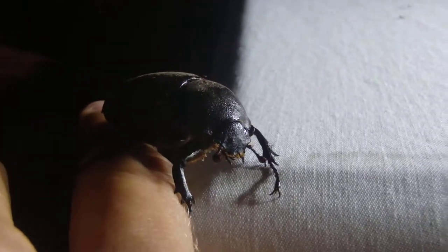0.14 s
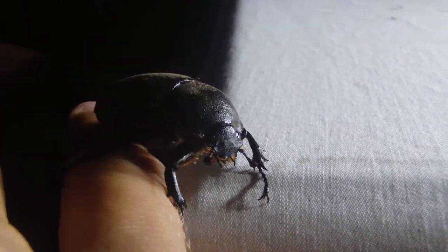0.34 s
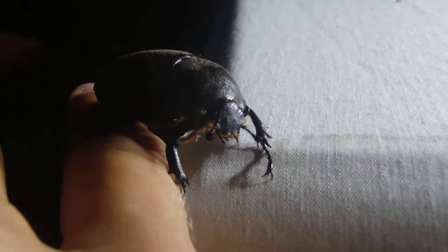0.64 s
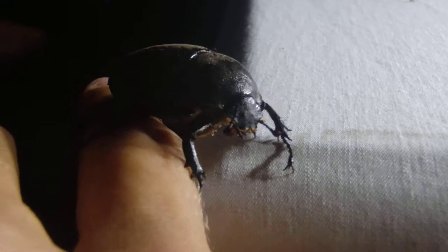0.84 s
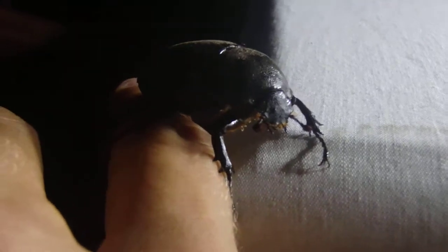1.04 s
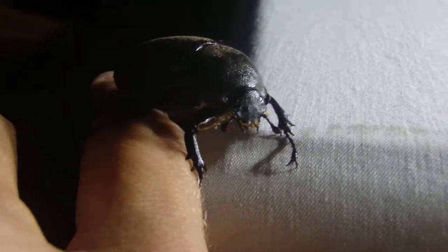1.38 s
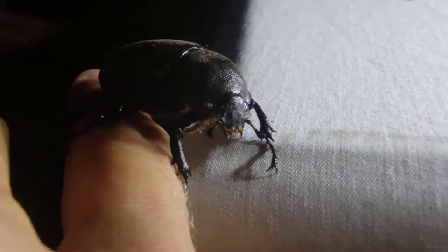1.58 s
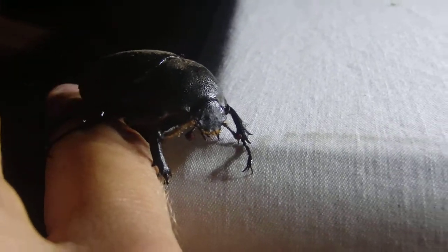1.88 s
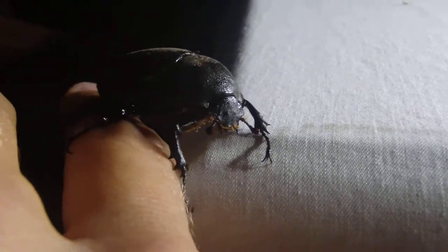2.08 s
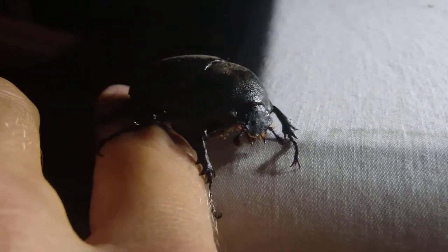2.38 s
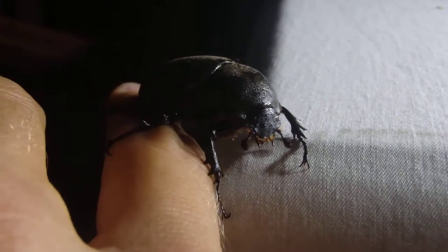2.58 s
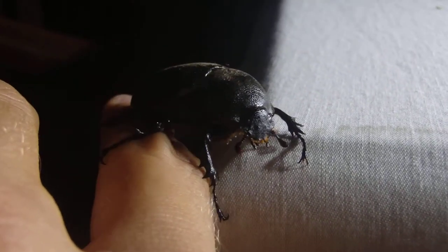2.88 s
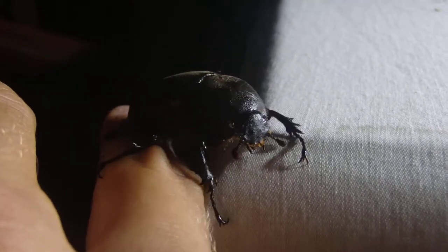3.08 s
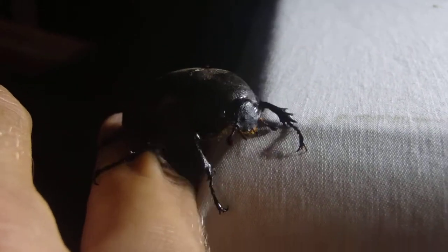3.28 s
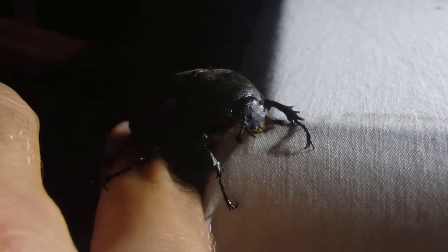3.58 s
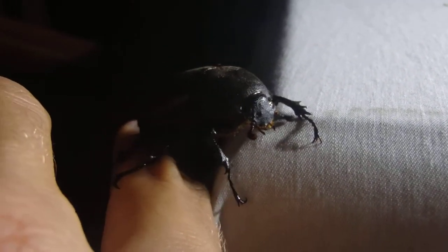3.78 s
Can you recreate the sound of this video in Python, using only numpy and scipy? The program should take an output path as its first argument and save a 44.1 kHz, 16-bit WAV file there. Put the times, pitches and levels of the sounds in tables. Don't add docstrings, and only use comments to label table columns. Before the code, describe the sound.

Quiet room with soft hiss and wavering motor hum; a small knock early, faint cloth brushing and steady camera ticking, then one scratchy beetle squeak very near the left microphone, followed by sparser ticks.

```python
import sys
import numpy as np
from scipy import signal
from scipy.fft import rfft, irfft, next_fast_len
from scipy.io import wavfile
from scipy.ndimage import uniform_filter1d

SR = 44100
rng = np.random.default_rng(int(sys.argv[2]) if len(sys.argv) > 2 else 0)


def int16_out(signal):
    q = np.round(np.clip(np.atleast_2d(signal).T, -1, 1) * 32767)
    wavfile.write(sys.argv[1], SR, q.astype(np.int16))


def field_ratio(decibels):
    return 10 ** (np.asarray(decibels, dtype=float) / 20)


N = 173754


def evened(x):
    return x / np.sqrt(np.mean(x ** 2) + 1e-20)


def wander(size):
    once = uniform_filter1d(rng.standard_normal(N), size=size)
    return evened(uniform_filter1d(once, size=size))


def read(points, hz):
    f, value = np.transpose(points)
    return np.interp(np.log(hz + 1), np.log(f + 1), value)


def causal(gain):
    log = np.log(np.concatenate([gain, gain[-2:0:-1]]) + 1e-5)
    return np.fft.ifft(np.exp(np.conj(signal.hilbert(log)))).real[:1024]


def clicks(s, db):
    out, at = np.zeros(N), np.asarray(s) * SR
    k = np.floor(at).astype(int)[:, None] + np.arange(-8, 9)
    offset = k - at[:, None]
    np.add.at(out, k, field_ratio(db)[:, None] * np.sinc(offset) * np.cos(offset * np.pi / 20) ** 2)
    return out


def ring(modes, rise_s):
    t = np.arange(3000) / SR
    out = np.zeros((2, len(t)))
    for k, (hz, db, t60, pan) in enumerate(modes):
        level_db = db - 60 * t / t60 + pan * np.array([[.5], [-.5]])
        out += (-1) ** k * field_ratio(level_db) * np.sin(2 * np.pi * hz * t)
    out = out * np.minimum(t / rise_s, 1)
    return out / abs(out).max()


def strike(hits, body):
    return signal.oaconvolve(hits[None], body, axes=1)[:, :N]


def room(x):
    level_db, t60 = -24, .18
    t = np.arange(12000) / SR
    signs = rng.choice([-1., 1.], (2, len(t)))
    sparse = rng.random((2, len(t))) < .05
    tail = signs * sparse * (t > .003) * field_ratio(-60 * t / t60)
    return field_ratio(level_db) * signal.fftconvolve(x, tail / np.linalg.norm(tail[0]), axes=1)[:, :N]


def hiss():
    # (frequency [Hz], density [dB per Hz])
    rumble = [(15, -28), (25, -33), (49, -12.5), (321, -2.5), (381, -7), (528, -4.5), (585, -6.5),
              (659, -7), (1500, -10), (1950, -50), (3300, -120)]
    # (frequency [Hz], density [dB per Hz])
    fizz = [(880, -30), (1500, -1.5), (2040, -1.5), (4330, -3), (5330, -5), (6960, -5.5), (14300, -4),
            (15200, -2), (16000, -15)]
    # (frequency [Hz], correlation [0 to 1])
    likeness = [(60, 0.0031), (130, 0.67), (290, 0.75), (640, 0.48), (1410, 0.34), (3100, 0), (6820, 0),
                (15000, -0.0)]
    # (frequency [Hz], left over right [dB])
    balance = [(25, -6), (60, -3), (125, -1), (3000, 0), (4300, 3.5), (6000, 0)]
    rumble_db, fizz_db, patch_db = -55.5, -50.5, 0.68
    frames, hz = N // 512 + 5, np.fft.rfftfreq(2048, 1 / SR)
    a, b, c, d, patches = rng.standard_normal((frames, 1025, 5)).T
    patches = uniform_filter1d(uniform_filter1d(patches, size=24, axis=0), size=6, axis=1)
    patches = evened(patches)
    low = field_ratio(read(rumble, hz)) * (hz < 1500)
    high = field_ratio(read(fizz, hz)) * (hz >= 1500)
    shape = field_ratio(rumble_db) * low / np.linalg.norm(low) + field_ratio(fizz_db) * high / np.linalg.norm(high)
    same = np.clip(read(likeness, hz), -1, 1)[:, None]
    left = a + 1j * b
    right = same * left + np.sqrt(1 - same ** 2) * (c + 1j * d)
    sides = np.array([.5, -.5])[:, None, None]
    level_db = patch_db * patches + read(balance, hz)[:, None] * sides
    z = np.array([left, right]) * shape[:, None] * field_ratio(level_db)
    noise = signal.istft(z, nperseg=2048, noverlap=1536)[1][:, :N]
    return np.linalg.norm(shape) * evened(noise)


def hum():
    # (frequency [Hz], level [dB rms], wavering [dB])
    tones = [(310, -77.5, 4.5), (362.8, -69, 4), (392.5, -66.5, 3), (589.5, -53.5, 1), (776, -77.5, 6.5),
             (875, -77.5, 8), (992, -93, 2)]
    t, out = np.arange(N) / SR, np.zeros(N)
    for hz, db, waver_db in tones:
        level, phase = wander(3000), wander(3000)
        angle = 2 * np.pi * hz * t + 0.096 * waver_db * phase + 6 * rng.random()
        out += np.sqrt(2) * field_ratio(db + waver_db * np.tanh(level)) * np.sin(angle)
    return out * field_ratio([[-.3], [.3]])


def whine():
    # (time at lowest [s], lowest frequency [Hz], half length [s])
    dips = [(.4, 7000, .021), (.532, 15200, .014), (.715, 13600, .008), (1.031, 13200, .011),
            (1.058, 11100, .018), (1.157, 10200, .016), (1.334, 9000, .011), (1.392, 6000, .02),
            (1.675, 8500, .022), (1.924, 10900, .013), (2.42, 10900, .012), (2.605, 15000, .005)]
    t = np.arange(N) / SR
    swoops = [low + (16000 - low) * abs((t - s) / half) ** 1.6 for s, low, half in dips]
    hz = np.min(swoops, 0)
    level_db = -54 + np.interp(hz, [8000, 11000, 14000, 15500], [-12, 0, 0, -5])
    level_db = level_db + np.array([[-9.], [0]])
    tone = np.sin(2 * np.pi * np.cumsum(np.minimum(hz, 18000)) / SR)
    return np.sqrt(2) * field_ratio(level_db) * (hz < 18000) * tone


def brushes():
    # (time [s], level [dB], t60 [s])
    rustles = [
        (.936, -53, .3),
        (1.084, -54, .4),
        (1.393, -54, .15),
    ]
    t = np.arange(N) / SR
    grit = rng.standard_normal((2, N)) * (rng.random(N) < .08)
    grit = grit + 0.52 * grit[::-1]
    band = signal.butter(2, [2100, 4900], "band", fs=SR, output="sos")
    fades = sum((t > s) * field_ratio(db - 60 * abs(t - s) / t60) for s, db, t60 in rustles)
    return evened(signal.sosfilt(band, grit)) * fades


def ticks():
    # (time [s], peak level [dB])
    steps = [(0.0872, -45), (0.4878, -43), (0.5527, -45), (0.622, -44), (0.699, -48), (0.7547, -40.5),
             (0.8877, -40), (1.0211, -36.5), (1.1557, -39), (1.2873, -36.5), (1.4204, -37), (1.5544, -36.5),
             (1.6202, -37.5), (1.6878, -40.5), (1.821, -34.5), (1.9544, -49), (2.0875, -38), (2.2226, -39),
             (2.3548, -36.5), (2.489, -35.5), (2.6215, -38), (3.147, -49), (3.4224, -35), (3.55684, -34.5),
             (3.6902, -38.5), (3.8238, -43)]
    soft_steps = [.5524, .6993, .8873, 1.1552, 1.6194, 1.6887, 2.0884, 2.2223, 3.8235]
    # (frequency [Hz], level [dB], t60 [s], left over right [dB])
    body = [(1240, 0, 0.014, -2), (1700, -1, 0.011, -1), (2150, -3, .006, 1)]
    # (frequency [Hz], level [dB], t60 [s], left over right [dB])
    snap_modes = [(2560, 0, .007, 3), (3120, 1, .007, 3), (3800, -1, .007, 8), (4600, -2, .006, -2)]
    s, db = np.transpose(steps)
    soft = abs(s[:, None] - soft_steps).min(1) < .004
    thud_db = db - 1.5 + 1.5 * soft
    snap_db = db + 1 + .3 * (db + 38) - 7 * soft
    thud = strike(clicks(s + .0005, thud_db), ring(body, .0005))
    snap = strike(clicks(s + .0003, snap_db), ring(snap_modes, .0003))
    return thud + snap


def small_blips():
    # (time [s], level [dB], frequency [Hz])
    blips = [(.1856, -37, 3820), (.266, -39, 2700), (3.1888, -45, 4450), (3.2128, -40, 3620),
             (3.225, -45, 3900), (3.3785, -45, 4150), (3.449, -41, 4450)]
    out = np.zeros((2, N))
    for s, db, hz in blips:
        out += strike(clicks([s], [db]), ring([(hz, 0, .007, 6), (.8 * hz, -6, .005, 0)], .0008))
    return out


def knock():
    # (frequency [Hz], level [dB], t60 [s], left over right [dB])
    modes = [(770, 0, .026, 0), (1400, -12, .008, 0), (2300, -9, .009, -2), (3100, -6, .008, 0),
             (4400, -6, .006, 6), (6500, -1, .008, 4), (7300, -2, .004, 4), (8800, -4, .003, 4)]
    start_s, level_db = .2132, -26.5
    tail_db, tail_t60 = -6.5, 0.19
    t = np.arange(N) / SR - start_s
    tap = strike(clicks([start_s, start_s + .0009], [level_db, level_db + 1]), ring(modes, .0002))
    tap = signal.lfilter(*signal.butter(2, 450, "high", fs=SR), tap)
    band = signal.butter(1, [600, 3800], "band", fs=SR, output="sos")
    rattle = signal.sosfilt(band, rng.standard_normal((2, N)))
    return tap + rattle * (t > 0) * field_ratio(level_db + tail_db - 60 * abs(t) / tail_t60)


def scrape(curve):
    slips_per_s, clump_db = 5000, 1.4
    s, db = np.transpose(curve)
    clump = wander(250)
    grit = rng.standard_normal(N) * (rng.random(N) < slips_per_s / SR)
    grit = evened(grit * field_ratio(clump_db * clump))
    grit = signal.lfilter(*signal.butter(2, [1000, 4900], "band", fs=SR), grit)
    return grit * field_ratio(np.interp(np.arange(N) / SR, s, db, -140, -140))


def shell_rubbing():
    # (time [s], level [dB])
    stirring = [(0.12, -72), (0.19, -61), (0.24, -58.5), (0.33, -63), (0.42, -72)]
    # (time [s], level [dB])
    squeeze = [(2.27, -68), (2.36, -54.5), (2.39, -65.5), (2.52, -52), (2.62, -53), (2.84, -58),
               (2.87, -67), (2.9, -61), (2.98, -60)]
    # (time [s], level [dB])
    settling = [(2.98, -51), (3.0, -48), (3.025, -48), (3.035, -46.5), (3.065, -48), (3.09, -52.5),
                (3.11, -49), (3.13, -59.5), (3.18, -63), (3.3, -73)]
    return scrape(squeeze) + scrape(settling) + scrape(stirring)


def slow_scraper():
    # (time [s], peak level [dB])
    slips = [(2.50391, -41.5), (2.51249, -39.2), (2.5181, -40.0), (2.53611, -35.7), (2.5526, -31.1),
             (2.56745, -27.5), (2.5779, -25.4), (2.58588, -25.0), (2.59431, -24.8), (2.60698, -25.7),
             (2.61824, -25.0), (2.62693, -24.1), (2.63441, -23.4), (2.64204, -26.1), (2.64762, -24.3),
             (2.65408, -20.6), (2.65935, -24.7), (2.66527, -23.9), (2.67314, -24.3), (2.68222, -24.6),
             (2.68956, -24.9), (2.69681, -24.5), (2.70587, -23.7), (2.71563, -24.6), (2.72479, -23.8),
             (2.73176, -23.3), (2.74109, -23.2), (2.75041, -23.5), (2.75902, -23.2), (2.77274, -23.1),
             (2.78699, -23.1), (2.80261, -23.2), (2.81779, -24.4), (2.83617, -23.7), (2.84814, -23.7),
             (2.86197, -24.9), (2.88143, -23.9), (2.89774, -23.8), (2.90706, -23.5), (2.91433, -23.0),
             (2.92025, -23.2), (2.92792, -23.6), (2.93539, -24.7), (2.94175, -25.3), (2.94828, -25.5),
             (2.95282, -26.0), (2.9566, -28.2), (2.95989, -28.0), (2.96252, -28.0), (2.96496, -29.3),
             (2.96726, -28.9), (2.9701, -29.7), (2.97278, -29.5), (2.97506, -30.3), (2.97698, -32.2),
             (2.97937, -32.0), (2.98134, -33.2), (2.98312, -33.4), (2.9846, -36.9)]
    s, db = np.transpose(slips)
    return clicks(s - .00007, db)


def fast_scraper():
    early_teeth = [2.61344, 2.6165, 2.61778, 2.61858, 2.6198, 2.62087, 2.62183, 2.62307, 2.62417, 2.6253,
                   2.62626, 2.62767, 2.6284, 2.62924, 2.63036, 2.63188, 2.63306, 2.63545, 2.63651, 2.63754,
                   2.63886, 2.64051, 2.64341, 2.64477, 2.64687, 2.64822, 2.64897, 2.65102, 2.65252, 2.65595,
                   2.65812, 2.65982, 2.66153, 2.66438, 2.66612, 2.66759, 2.66896, 2.66994, 2.67144, 2.67266,
                   2.67392, 2.67531, 2.67699, 2.67837, 2.67966, 2.68091, 2.6843, 2.68559, 2.68714, 2.68907,
                   2.69066, 2.69156, 2.69286, 2.69511, 2.6983, 2.69975, 2.7012, 2.70327, 2.70496, 2.70644]
    later_teeth = [2.70861, 2.71014, 2.71203, 2.71335, 2.71494, 2.71687, 2.71841, 2.7201, 2.72168, 2.72398,
                   2.72566, 2.72697, 2.72848, 2.73069, 2.73241, 2.73446, 2.73649, 2.73853, 2.74028, 2.74251,
                   2.74465, 2.74732, 2.74933, 2.75086, 2.75286, 2.75444, 2.75622, 2.75811, 2.75957, 2.76158,
                   2.76354, 2.76618, 2.76862, 2.77105, 2.77484, 2.77692, 2.77877, 2.78091, 2.78245, 2.7846,
                   2.7858, 2.78749, 2.78859, 2.79037, 2.79286, 2.79473, 2.7965, 2.79857, 2.80027, 2.80218,
                   2.80389, 2.80528, 2.80715, 2.80901, 2.81142, 2.81259, 2.81632, 2.81971, 2.82114, 2.82517]
    # (time [s], peak level [dB])
    pressure = [(2.613, -38), (2.62, -34), (2.638, -33), (2.645, -30), (2.662, -26.5), (2.74, -24.7),
                (2.795, -28), (2.806, -33), (2.827, -38)]
    uneven_db = .7
    teeth = np.concatenate([early_teeth, later_teeth])
    press_db = np.interp(teeth, *np.transpose(pressure)) + uneven_db * rng.standard_normal(len(teeth))
    return clicks(teeth - .00007, press_db)


def shell_response():
    # (frequency [Hz], level [dB])
    near_curve = [(700, -32), (2300, -16), (2900, -16.5), (3600, -10), (5700, -19), (7400, -12),
                  (9700, -13.5), (13500, -34)]
    # (frequency [Hz], level [dB])
    far_curve = [(700, -33), (2300, -10.5), (4750, -10), (5150, -40), (5900, -36), (6300, -21), (9000, -29),
                 (14000, -36)]
    # (frequency [Hz], width [Hz], level [dB])
    shell = [(4220, 260, 7), (4520, 350, 5), (4950, 450, -5), (6450, 400, -4)]
    far_lag_s = .00001
    hz = np.fft.rfftfreq(4096, 1 / SR)
    peaks = sum(field_ratio(db) ** 2 / (1 + (2 * (hz - f) / width) ** 2) ** 1.5 for f, width, db in shell)
    near = causal(np.sqrt(field_ratio(read(near_curve, hz)) ** 2 + peaks))
    far = causal(field_ratio(read(far_curve, hz)))
    lag = np.exp(-2j * np.pi * np.fft.rfftfreq(2048, 1 / SR) * far_lag_s)
    far = irfft(rfft(far, 2048) * lag)[:1024]
    return np.array([near, far]) / abs(near).max()


def beetle():
    soft_start, port_turn = .55, 1.35
    drive = field_ratio(6.0) * (slow_scraper() + fast_scraper()) + shell_rubbing()
    for _ in range(2):
        drive = signal.lfilter([soft_start, 1], [1, soft_start], drive)
    drive = (signal.hilbert(drive, next_fast_len(N))[:N] * np.exp(1j * port_turn)).real
    return strike(drive, shell_response())


def scene():
    near = beetle() + knock() + small_blips()
    return near + room(near) + ticks() + brushes() + whine() + hum() + hiss()


def band_limit(x):
    return signal.sosfilt(signal.butter(12, 16150, fs=SR, output="sos"), x)


def record(dry):
    edge_hz = 15780
    lowpass = signal.firwin(2047, edge_hz, window=("kaiser", 9), fs=SR)
    mix = signal.oaconvolve(dry, lowpass[None], "same")
    return band_limit(mix)


dry = scene()
out = record(dry)
int16_out(out)
```